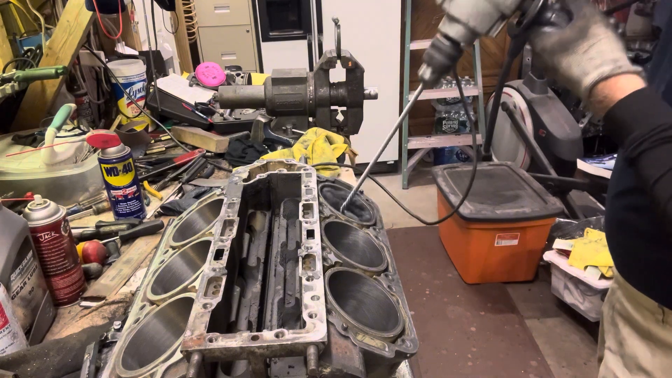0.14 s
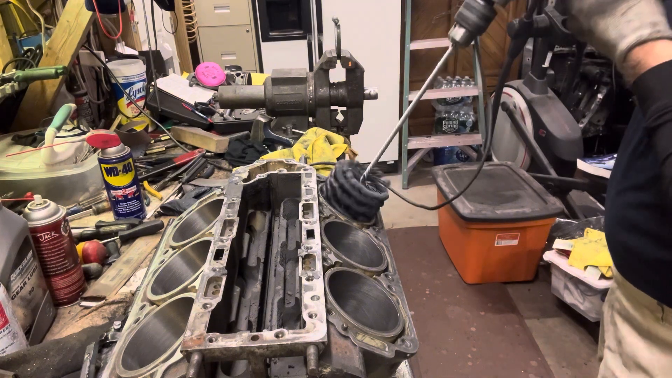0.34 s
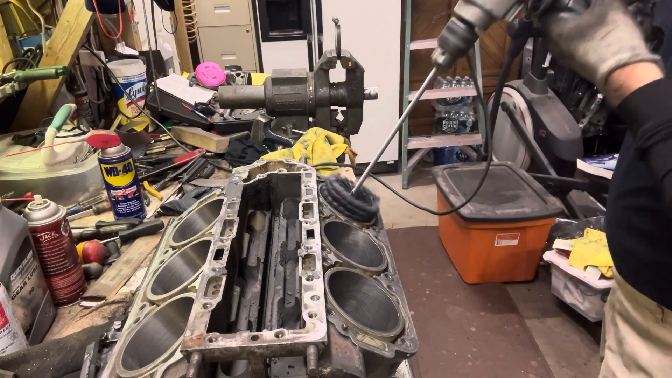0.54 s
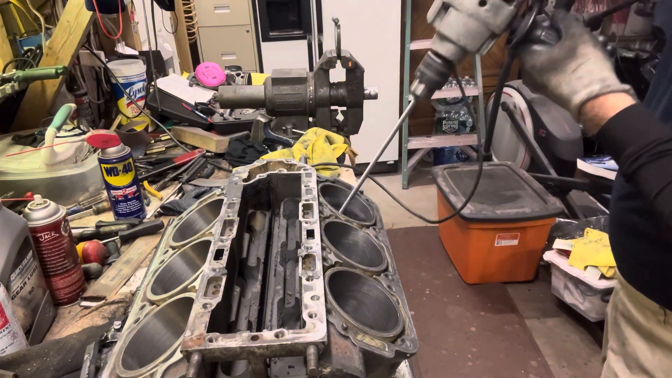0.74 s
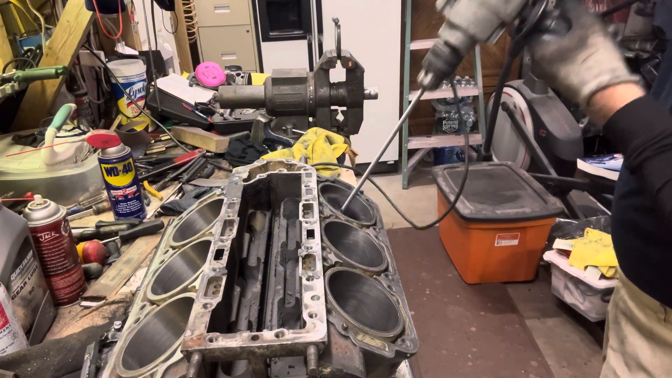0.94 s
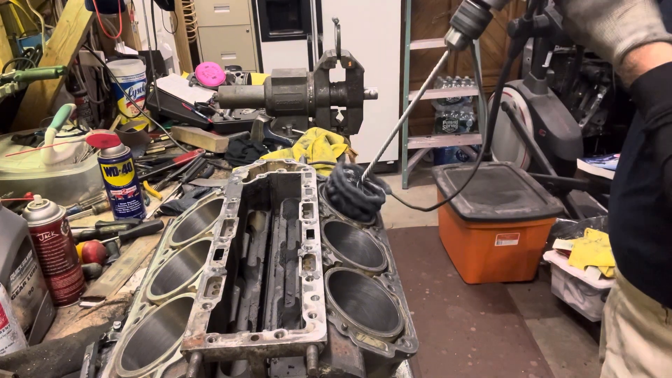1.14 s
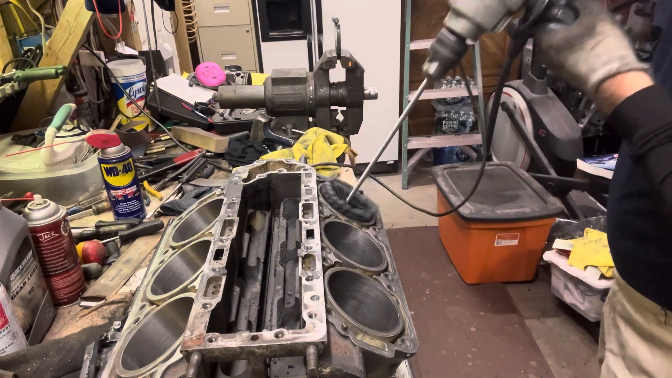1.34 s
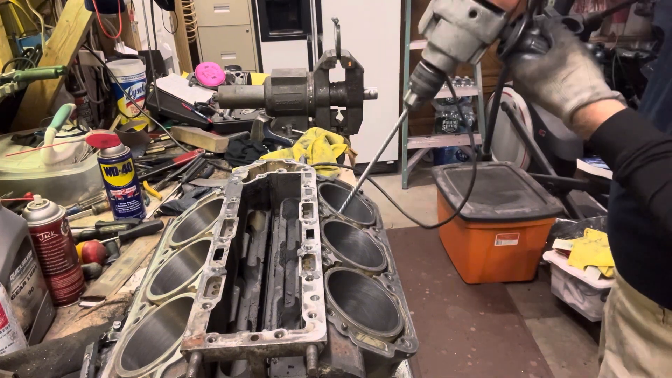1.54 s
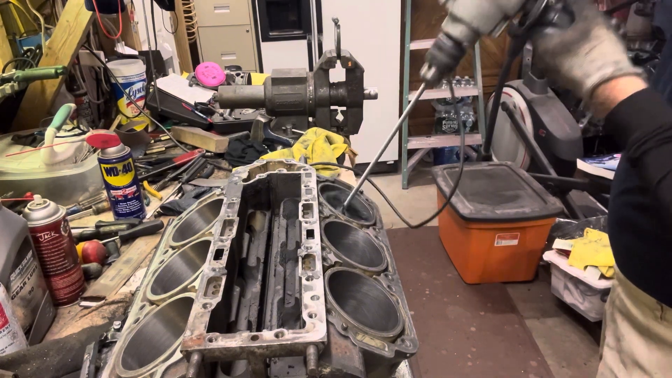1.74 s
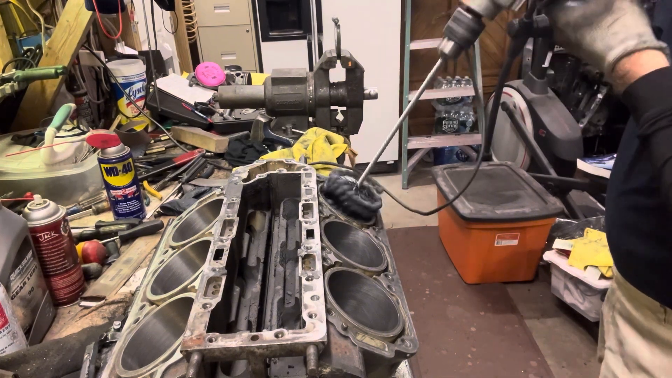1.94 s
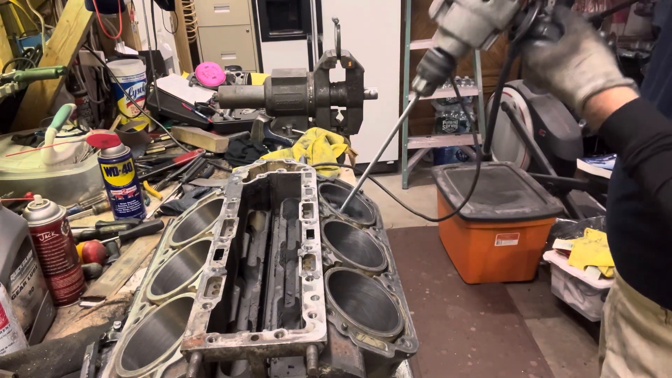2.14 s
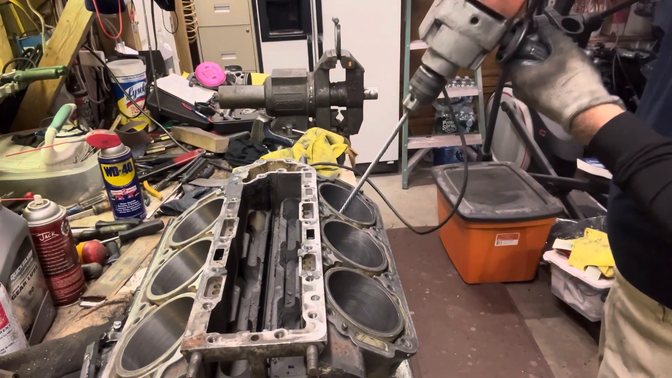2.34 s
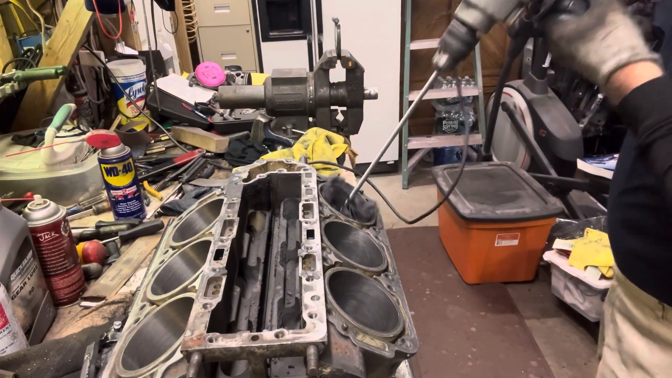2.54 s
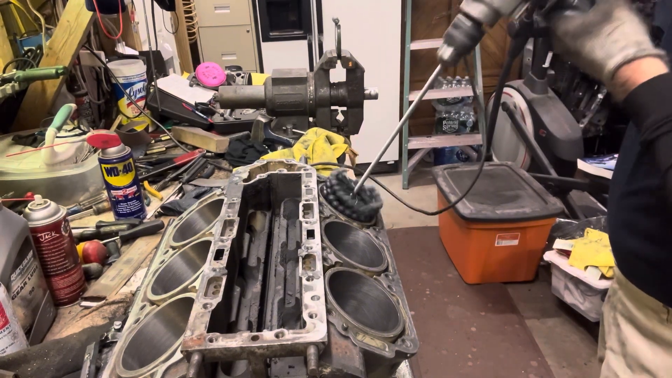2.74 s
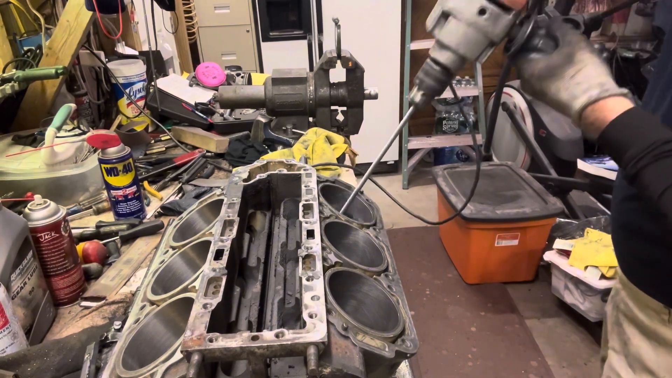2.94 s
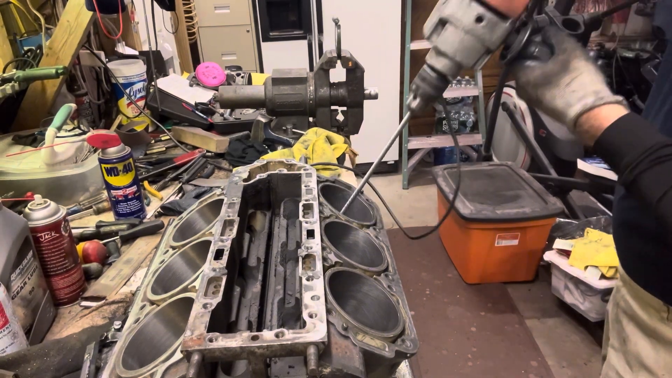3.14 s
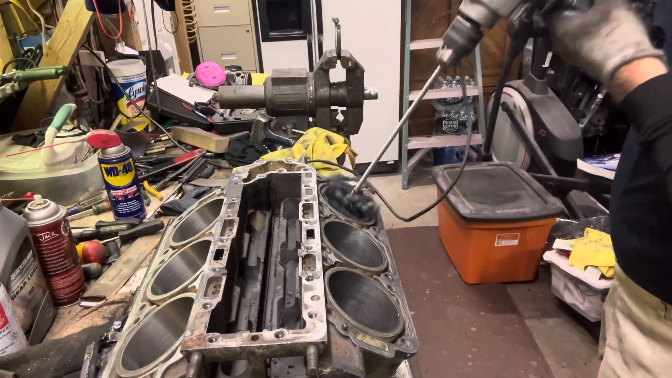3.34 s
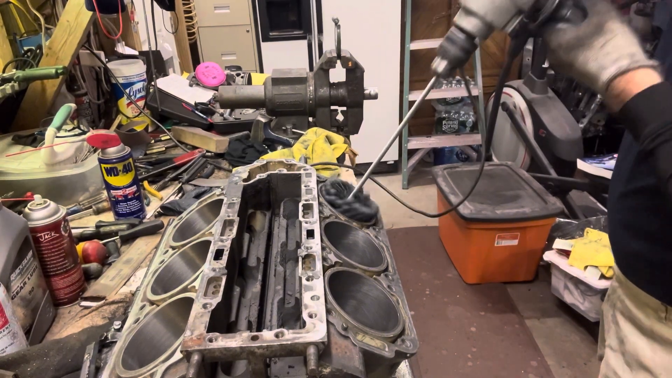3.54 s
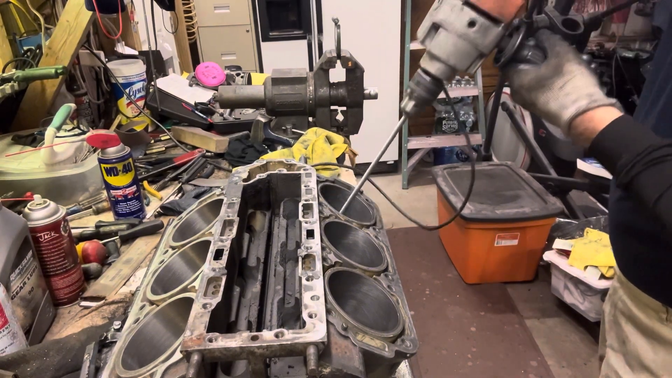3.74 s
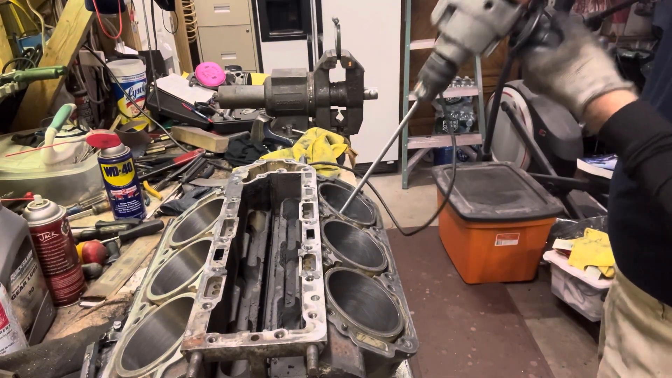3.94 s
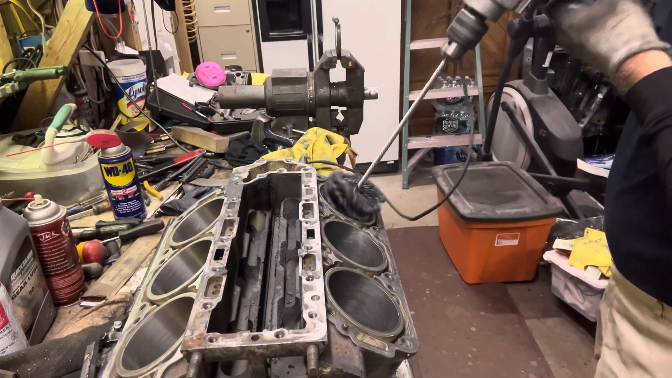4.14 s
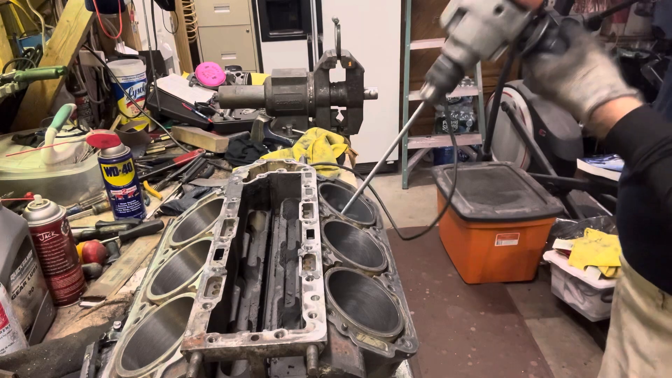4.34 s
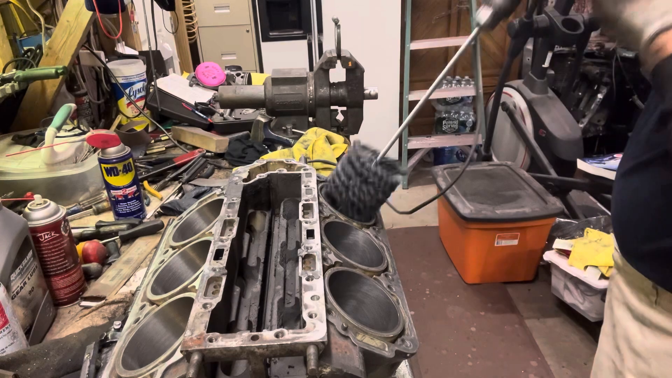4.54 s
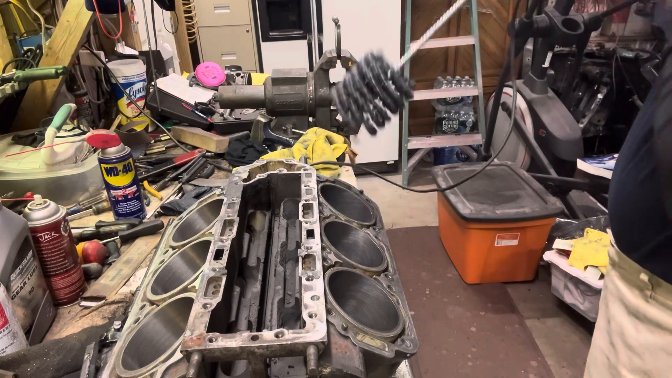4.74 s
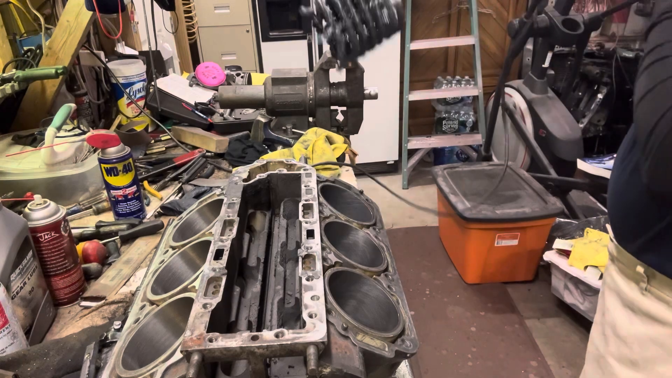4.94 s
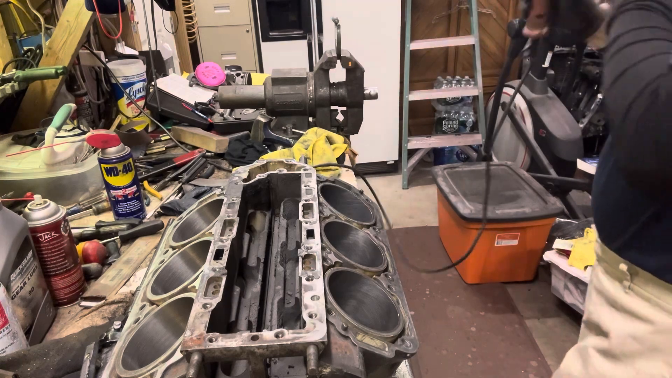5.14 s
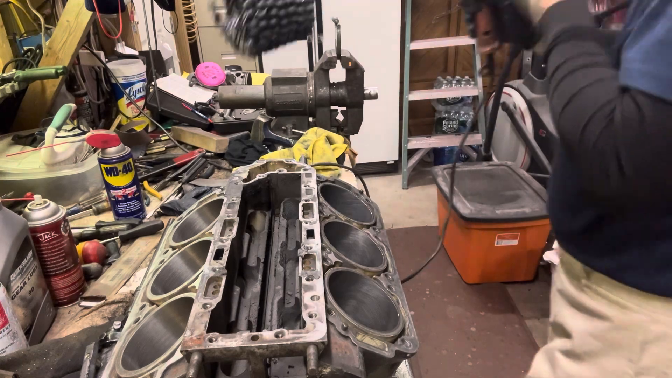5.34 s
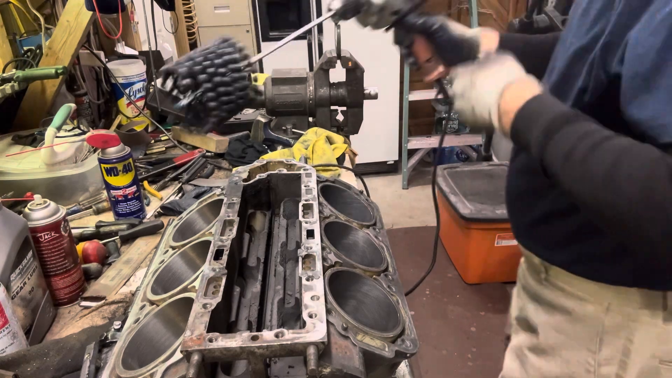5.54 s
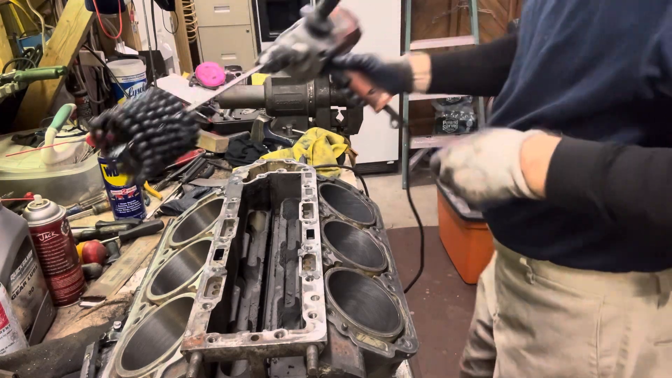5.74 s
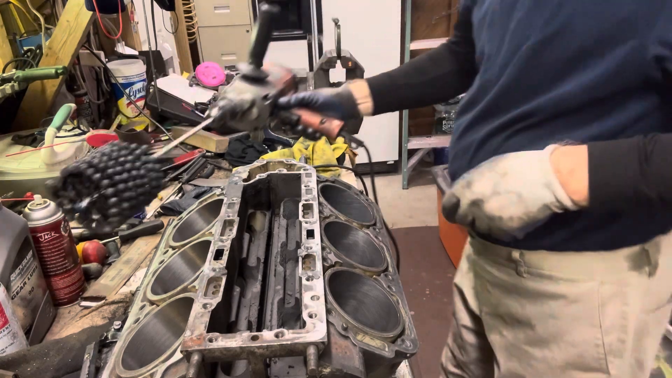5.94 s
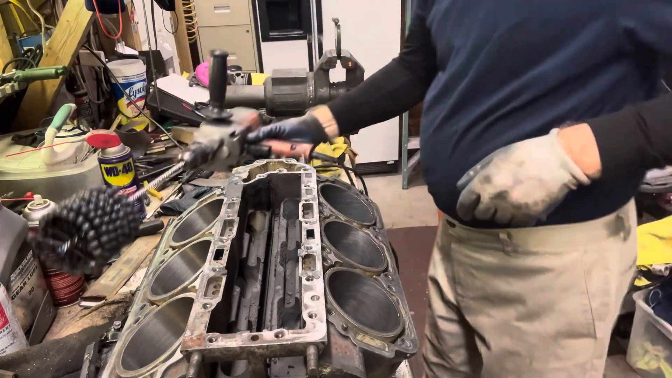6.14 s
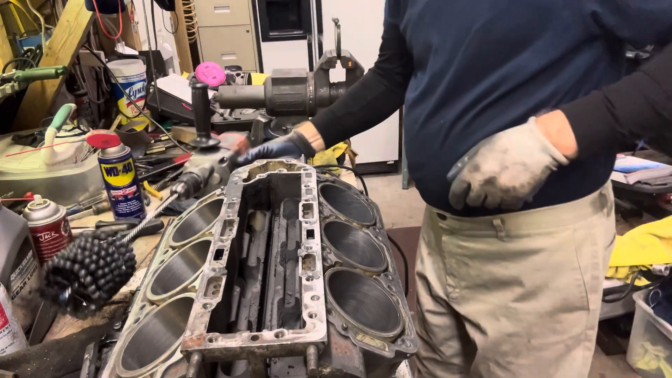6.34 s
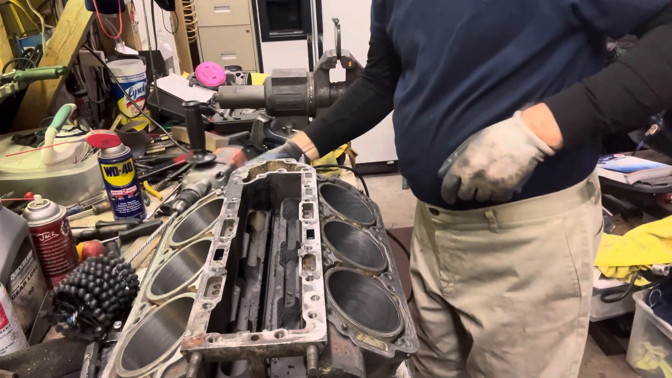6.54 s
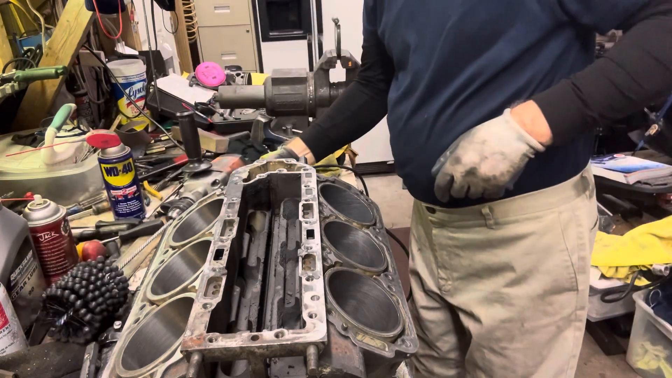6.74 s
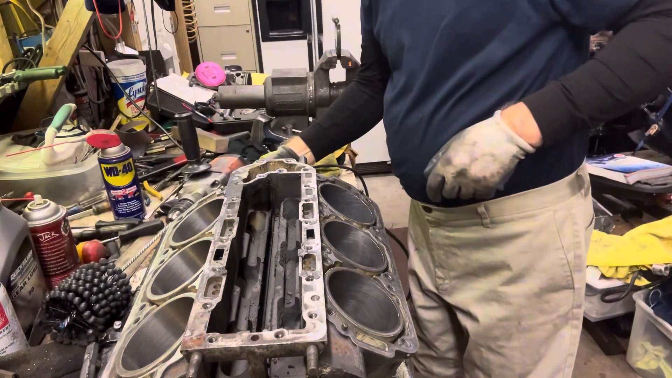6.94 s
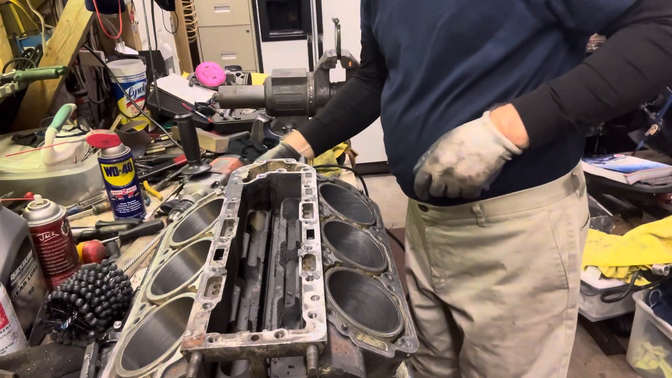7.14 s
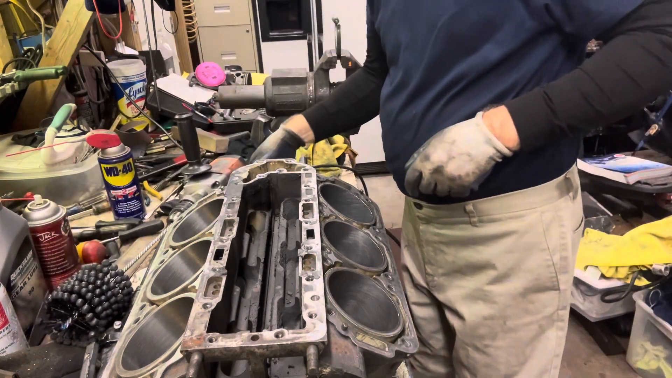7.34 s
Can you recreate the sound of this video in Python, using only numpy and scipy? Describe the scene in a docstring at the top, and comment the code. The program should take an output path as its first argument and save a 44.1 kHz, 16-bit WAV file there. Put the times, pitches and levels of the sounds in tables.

```python
"""Honing an engine cylinder with a drill

A corded drill strokes a ball hone up and down an oiled cylinder in a small workshop.
Load and motor speed steer sine tones for the whining gears and random impacts for their chatter.
Filtered grains and gliding squeaks make the abrasive balls scrape the ringing bore.
The hone comes out, the drill coasts down with rattling gears and is laid on the bench with faint clicks."""
import sys
import numpy as np
from scipy import signal
from scipy.fft import rfft, irfft, next_fast_len
from scipy.io import wavfile

SR = 44100
rng = np.random.default_rng(int(sys.argv[2]) if len(sys.argv) > 2 else 0)


def file_out(sig):
    """Save sig as 16-bit WAV at sys.argv[1]."""
    # one column per channel
    cols = np.atleast_2d(sig).T
    # limit, then scale
    lim = np.clip(cols, -1, 1)
    pcm = np.round(lim * 32767).astype(np.int16)
    wavfile.write(sys.argv[1], SR, pcm)


N = 330285
T = np.arange(N) / SR
SIZE = next_fast_len(N + SR // 2, real=True)  # room for filter tails
FREQ = np.maximum(np.arange(SIZE // 2 + 1) * SR / SIZE, 1)

TEETH = 7  # on the motor's pinion
FULL_HZ = 606  # tooth mesh rate counted as speed 1
# the hone is clear of the bore at OUT_S; the scrape and the strain on the gears fade just before
OUT_S, EXIT_S, UNLOAD_S = 4.55, 0.075, 0.21

# strokes of the hone: (bottom t/s, build-up of the drag t/s, load 0-1,
# bottom to mouth of the bore t/s, extra scrape at the mouth level/dB)
STROKES = [(0.099, 0.5545, 0.92, 0.46, 2.5), (0.85, .137, 0.56, 0.46, 4), (1.611, .175, 0.44, 0.43, 2),
           (2.357, 0.21, 0.89, 0.424, 4.5), (3.105, .125, .85, 0.61, 0), (3.862, 0.21, 1.0, 0.17, 0.5),
           (4.227, 0.0258, 0.98, 0.14, 2)]
# microphone pair: (f/Hz, phase by which left leads/rad, strength of the reflections' side part level/dB)
PAIR = [(40, 0, -6), (250, -.3, -1), (780, -2, 1), (1250, -1.1, 0), (1900, -2, 4), (2330, -1.2, 3),
        (2440, -2.7, 3), (2540, -2.4, 3), (2760, -5, 2), (2950, -4.6, 1), (3200, -5.1, -1), (3750, -5.1, 1),
        (4500, -7.7, 2), (6000, -8, 2), (6400, -7.4, 0), (7450, -8.2, 2), (7750, -6.3, -15),
        (11600, -6.3, -15), (12600, -3.6, 0)]


def mesh_rate():
    """Gear teeth met per second: the trigger sets it, load drags it down late, friction stops it at the end."""
    # trigger position: (t/s, mesh rate without load f/Hz)
    trigger = [(0.0, 794.6), (0.5, 802), (1.2, 784), (1.7, 681.1), (2.6, 635.4), (3.4, 622.1), (4.5, 601.1)]
    sag = .082  # share of speed lost at load 1
    lag_s, inertia_s = 0.03877, 0.07012  # how late and how slowly the motor follows the load
    off_s, brake_hz_per_s = 4.485, 424  # the trigger is let go
    s, hz = np.transpose(trigger)
    free_hz = np.interp(T, s, hz)
    load = hone_load(T - lag_s)
    keep = np.exp(-1 / (inertia_s * SR))
    felt = load[0] + signal.lfilter([1 - keep], [1, -keep], load - load[0])
    slowing = brake_hz_per_s * np.maximum(T - off_s, 0)
    return np.maximum(free_hz * (1 - sag * felt) - slowing, 1e-3)


def hone_load(t, relax_s=.067):
    """Drag on the drill: it grows ever faster towards the bottom of a stroke, then quickly relaxes."""
    return sum(load * np.exp(-np.maximum(s - t, 0) / build_s - np.maximum(t - s, 0) / relax_s)
               for s, build_s, load, _, _ in STROKES)


def in_bore(fade_s):
    """1 while the hone is in the cylinder, fading to 0 as it leaves."""
    return np.clip((OUT_S - T) / fade_s, 0, 1)


def gear_whine(turns, mesh_hz, strain, jitter=0.016, trim_db=-4.0, runout=0.096):
    """Pinion teeth mesh a little unevenly; strain lifts the tones, the third and fifth most of all."""
    # whine before trim and resonances: (multiple of the mesh rate, level/dB, level/dB added at strain 1)
    gear_tones = [(1, -60.5, 9.5), (2, -55.5, 8), (3, -60.5, 26), (4, -55, 12), (5, -61.5, 18),
                  (6, -57, 4.5)]
    cycles = TEETH * turns + jitter * walk(rate=250)
    # an off-centre pinion presses harder once a turn
    contact = 1 + runout * np.cos(2 * np.pi * turns)
    tones = 0
    for k, db, load_db in gear_tones:
        tone_db = db + load_db * strain + shell_db(k * mesh_hz)
        tones = tones + tone(round(k) * cycles, k * mesh_hz, squealing(TEETH * round(k), tone_db))
    return in_bore(UNLOAD_S) * contact * tones * undb(trim_db)


def shell_db(hz):
    """Lift of a tone by the resonances of the drill's shell, in dB."""
    # shell resonances: (f/Hz, width f/Hz, lift at the centre level/dB)
    shell = [(809, 65, 24.5), (1444, 335, 20), (1943, 125, 3), (2340, 270, 6), (3000, 1230, 13.5)]
    return sum(db / (1 + (2 * (hz - centre) / width) ** 2) for centre, width, db in shell)


def squealing(order, db):
    """Level in dB of the tone at one multiple of the motor speed, swelling smoothly into its squeals."""
    # flare-ups of gear or armature tones, before trim: (t/s, half length t/s, multiple of motor speed,
    # level/dB)
    squeal_list = [(0.126, 0.068, 7, -27), (0.5, 0.2, 28, -26), (.92, .22, 28, -31.5), (.76, 0.3, 7, -31),
                   (0.765, 0.24, 14, -28), (1.208, .09, 28, -29), (1.5, 0.15, 7, -34),
                   (1.555, 0.09, 28, -22.5), (1.9, 0.17, 14, -33), (2.1, .35, 24, -42),
                   (2.334, 0.08, 21, -24.5), (2.324, .07, 28, -26), (2.32, 0.14, 35, -34),
                   (2.358, 0.05, 42, -34), (2.6, .22, 14, -37), (2.9, .14, 28, -29), (3.08, 0.1, 21, -24.5),
                   (3.11, 0.072, 35, -28), (3.455, 0.1, 14, -34), (3.5, .25, 28, -32),
                   (3.74, .2, 35, -30.5), (3.884, 0.095, 28, -24), (3.8, 0.5, 7, -40),
                   (4.236, 0.025, 21, -27), (4.78, .09, 24, -49), (4.844, .04, 12, -45)]
    swell = sum(undb(peak_db) * np.exp(-((T - s) / half_s) ** 2)
                for s, half_s, k, peak_db in squeal_list if round(k) == order)
    return 20 * np.log10(np.hypot(undb(db), swell) + 1e-12)


def tone(cycles, hz, db, flutter_db=1.8, swirl=0.4):
    """A stereo sine; as the drill moves through the room's standing waves each side flutters on its own."""
    pair_hz, pair_lead, _ = np.transpose(PAIR)
    lead = swirl * walk(rate=9) + np.interp(hz, pair_hz, pair_lead)
    sides = []
    for sign in (1, -1):
        gain = np.sqrt(2) * undb(db + flutter_db * walk(rate=42))
        sides.append(gain * np.sin(2 * np.pi * cycles + sign * lead / 2))
    return np.array(sides)


def chatter(turns, mesh_hz, gain, tooth_depth=0.42, pole_depth=0.63, slack_depth=0.45,
            loose=0.95, trim_db=-2):
    """Teeth and brushes rasp in time with the motor and ring the shell; slow gears add separate ticks."""
    slow = np.clip(1 - mesh_hz / 560, 0, 1)
    tooth = 1 + tooth_depth * np.cos(2 * np.pi * TEETH * turns)
    # the brushes pulse twice a turn
    pole = 1 + (pole_depth + slack_depth * slow) * np.cos(2 * np.pi * 2 * turns)
    rasp = grains(rate=7000, spread_db=2.5) * (1 - slow / 2)
    ticks = loose * np.sqrt(slow) * grains(rate=390, spread_db=2.4)
    ringing = housing((rasp + ticks) * tooth ** 2 * pole)
    return unit(ringing) * gain * undb(trim_db + 1.0 * walk(rate=45))


def housing(x, flicker_db=1.5):
    """The gearbox shell rings; its modes swell and fade separately as the gears shift on their bearings."""
    # gearbox resonances: (f/Hz, width f/Hz, level relative to each other/dB)
    box_modes = [(844, 160, -2.5), (1310, 200, -1), (1575, 110, 2), (1890, 170, 2), (2250, 200, -1),
                 (2525, 350, 1), (3120, 400, -0.5), (3830, 710, -10.5)]
    out = 0
    for k, (hz, width, db) in enumerate(box_modes):
        gain = (-1) ** k * undb(db + flicker_db * walk(rate=32))
        out = out + gain * shape(x, resonance(hz, width))
    return out


def chatter_level(speed, strain):
    """Gain of the chatter: it rises with speed and strain, and a light rattle stays when gears run free."""
    driven = undb(-31.5 + 4 * strain) * speed ** 1.55
    stall_speed = 0.03  # below this the coasting gears fall silent
    coasting = undb(-46) * speed ** 0.64 * np.minimum(speed / stall_speed, 1)
    return np.hypot(driven * in_bore(UNLOAD_S), coasting)


def armature(turns, mesh_hz, air_db=-46, jitter=0.004, flutter_db=3.2, coupling=0.3, coast_db=-8,
             speed_power=1.7):
    """Fan and commutator tones slide through the shell's resonances over rushing air; coasting fades them."""
    # armature tones before speed and resonances act: (multiple of the motor speed, level/dB)
    motor_lines = [(12, -51), (24, -55), (36, -53)]
    speed = np.minimum(mesh_hz / FULL_HZ, 1)
    coasting = 1 - in_bore(EXIT_S)
    shaky = turns + jitter * (1 + coasting) * walk(rate=160)
    motor_hz = mesh_hz / TEETH
    drive_db = 20 * speed_power * np.log10(speed) + coast_db * (coasting - .5)
    tones = 0
    for k, db in motor_lines:
        tone_db = db + drive_db + coupling * shell_db(k * motor_hz)
        tones = tones + tone(round(k) * shaky, k * motor_hz, squealing(round(k), tone_db), flutter_db)
    air_colour = colour([(100, -24.0), (450, -6.5), (620, -1.5), (1200, -19), (3000, -9.5), (12000, -39.5)])
    air = unit(shape(noise(), air_colour))
    return tones, air * undb(air_db) * speed ** 1.24


def hone(gain, catch_db=-13, ring_db=-0.5, squeak_db=-12, trim_db=1.0):
    """Balls drag in tiny slips and squeaks; the wall's modes flicker as the balls move over it."""
    # cylinder wall resonances: (f/Hz, width f/Hz, level against the broad scrape before ring_db/dB)
    wall_modes = [(1330, 18, -6), (3060, 30, -2), (3210, 45, 1.5), (3645, 36, -1), (3898, 16, -3),
                  (4348, 16, -3), (4925, 40, -3), (6380, 70, -4), (6950, 83, -2.5), (7730, 100, -7)]
    # broad colour of the scrape: (f/Hz, level/dB)
    scrape_colour = [(25, -10.5), (55, -0.5), (110, -6), (170, -13), (320, -5), (460, 0.5), (580, 3),
                     (1200, -3.5), (2500, 0.5), (4500, 1.5), (6000, 3), (7300, 3), (7900, 4), (11800, -2),
                     (15500, -4.5)]
    pressure = undb(1.8 * walk(rate=130))
    slips = grains(rate=6000, spread_db=1.5) * pressure
    catches = undb(catch_db) * grains(rate=160, spread_db=3.0)
    scrape = shape(slips + catches, colour(scrape_colour))
    wall = sum(undb(db + ring_db + 3 * walk(rate=18)) * shape(scrape, resonance(hz, width))
               for hz, width, db in wall_modes)
    return (unit(scrape + wall) + undb(squeak_db) * squeaks()) * gain * undb(trim_db)


def squeaks(count=1300, spread_db=4):
    """Single balls stick and slip: short gliding squeaks, each with its own pitch, length and strength."""
    low_hz, high_hz = 1600, 3600  # range of starting pitches
    mean_s, glide_spread = .04, .02  # average length; spread of the glides as a share of the pitch
    out = np.zeros(N + SR)
    for (when, pitch, length), (glide, size) in zip(rng.random((count, 3)), rng.standard_normal((count, 2))):
        age = np.linspace(0, 1, int(mean_s * (.5 + length) * SR))
        hz = low_hz * (high_hz / low_hz) ** pitch * (1 + glide_spread * glide * age)
        swell = np.sin(np.pi * np.sqrt(age)) ** 2
        squeak = swell * np.sin(2 * np.pi * np.cumsum(hz) / SR)
        start = int(when * N)
        out[start:start + len(age)] += undb(spread_db * min(size, 2)) * squeak
    return unit(out[:N])


def scrape_level(speed, strain, mouth_s=0.069, dip_db=-1, dip_s=0.043):
    """Gain of the hone: load and the mouth raise it, it dips just after the mouth; outside, a faint swish."""
    stroke_db = 0
    for s, _, _, rise_s, db in STROKES:
        stroke_db = stroke_db + db * np.exp(-((T - s - rise_s) / mouth_s) ** 2)
        stroke_db = stroke_db + dip_db * np.exp(-((T - s - 1.2 * rise_s) / dip_s) ** 2)
    scraping = undb(-29 + 5 * strain + stroke_db) * speed ** 0.92
    swish = undb(-45.5) * speed ** 1.3
    return np.hypot(scraping * in_bore(EXIT_S), swish)


def ball_snaps():
    """Balls catch and snap against the bore: bright, short bursts."""
    # snaps: (t/s, peak before the room level/dB, t60 of the burst t/s)
    snap_list = [(1.27, -15, .05), (1.4945, -12, .04), (2.34, -12, .07), (2.39, -9.5, .07),
                 (2.527, -11, .014), (2.966, -11.5, .04), (3.318, -10, .01), (3.945, -11, .014),
                 (4.412, -12, .008)]
    ball = broad(hz=8400, width=1.3)
    return sum(knock(s, db, t60, ball) for s, db, t60 in snap_list)


def gear_ticks():
    """Gear teeth knock through their slack while coasting and ring the gear."""
    # knocks: (t/s, peak before the room level/dB)
    backlash = [(4.562, -24), (4.5784, -22), (4.6055, -16.5), (4.632, -20.5), (4.653, -24), (4.6753, -20),
                (4.7593, -34), (4.7886, -31), (4.811, -32), (4.847, -34), (4.921, -24), (4.944, -31),
                (5.0295, -27), (5.0713, -30), (5.124, -27.5), (5.1538, -34), (5.1802, -32), (5.2046, -34)]
    # modes of the knocking gear: (f/Hz, width before squaring f/Hz, level/dB)
    gear_modes = [(3250, 340, 0.5), (3460, 340, -1)]
    gear = sum(undb(db) * resonance(hz, width) ** 2 for hz, width, db in gear_modes)
    return sum(knock(s, db, .005, gear) for s, db in backlash)


def chuck_rattles():
    """The hone's shank rattles in the ringing chuck as the drill is swung aside."""
    # rattles: (t/s, peak before the room level/dB)
    rattle_list = [(5.153, -29), (5.43, -34.5), (5.464, -37), (5.562, -46), (5.581, -42), (5.635, -42),
                   (5.672, -42), (5.765, -39), (5.868, -38)]
    # modes of the chuck: (f/Hz, width f/Hz, level/dB)
    chuck_modes = [(1750, 130, 1), (2500, 130, 2), (3240, 110, -4)]
    chuck = sum(undb(db) * resonance(hz, width) for hz, width, db in chuck_modes)
    return sum(knock(s, db, t60=0.025, response=chuck) for s, db in rattle_list)


def block_jolts():
    """The hone jolts the heavy engine block, which answers with a dull thud."""
    # jolts: (t/s, peak before the room level/dB, centre f/Hz)
    jolt_list = [(3.822, -33.5, 97.4), (3.947, -34, 51)]
    return sum(knock(s, db, t60=0.089, response=broad(hz, width=0.29)) for s, db, hz in jolt_list)


def handling_clicks():
    """The tool clicks while being put down, each contact a damped burst."""
    # clicks: (t/s, peak before the room level/dB, centre f/Hz, t60 of the burst t/s,
    # width before squaring as a share of the centre)
    click_list = [(5.124, -28, 1500, 0.049, 1.6), (5.225, -29, 1900, 0.025, 4.5),
                  (5.288, -30, 1305, 0.06, 2.6), (5.342, -31.5, 1900, 0.035, 2.6),
                  (5.404, -32, 2580, 0.031, 1.6), (5.817, -32.5, 1000, 0.12, 1.4),
                  (6.557, -34.5, 8280, 0.0083, 0.56), (6.644, -34.5, 1750, 0.028, 1.6),
                  (6.777, -34, 1450, 0.029, 2.1), (7.149, -42.5, 4100, 0.09, 0.85)]
    return sum(knock(s, db, t60, broad(hz, width)) for s, db, hz, t60, width in click_list)


def rustle(attack_s=0.012, release_s=0.053, fade_db_per_s=25):
    """Sleeve and cord slide softly; each slide starts briskly and tails off."""
    # slides: (t/s, length t/s, starting level before the room/dB)
    slide_list = [(6.133, 0.23, -60), (6.45, 0.22, -61.5), (6.728, 0.12, -61), (7.102, 0.6, -60)]
    gain = 0
    for s, length, db in slide_list:
        ramp = np.clip(np.minimum((T - s) / attack_s, (s + length - T) / release_s), 0, 1)
        gain = gain + ramp * undb(db - fade_db_per_s * np.maximum(T - s, 0))
    rub_colour = colour([(200, 5), (1000, 11.5), (3000, 3), (10000, -4), (14000, -15)])
    return unit(shape(grains(rate=3400, spread_db=-0.5), rub_colour)) * gain


def background(width=0.58):
    """Low rumble, hiss and a machine's mains hum fill the room, slightly stronger on the left."""
    # colour of rumble and hiss: (f/Hz, level/dB)
    room_tone = [(20, -38.5), (40, -8.5), (58, -6), (80, -4.5), (120, -11.5), (170, -15), (245, -12),
                 (400, -18), (700, -26), (1500, -32.5), (4000, -46.5), (12000, -64)]
    # hum, wavering around these values: (f/Hz, level before the lean to the left/dB)
    hum_lines = [(59.2, -51.5), (237, -58)]
    mid, side = (unit(shape(noise(), colour(room_tone))) for _ in range(2))
    hum = 0
    for hz, db in hum_lines:
        gain = np.sqrt(2) * undb(db + 2 * walk(rate=8.3))
        hum = hum + gain * np.sin(2 * np.pi * hz * T + 1.2 * walk(rate=7))
    air = undb(-50.0) * (mid + width * np.array([side, -side]))
    return (air + hum) * undb([[1.2], [-1.2]])


def workshop(x, reflections_db, t60=0.16):
    """Direct sound with left mostly behind right in phase, plus short reflections from the clutter."""
    # left minus right level of the room: (f/Hz, level/dB)
    lean_curve = [(110, 5.5), (380, 0), (700, -3.5), (1290, -2.5), (2400, 1), (4400, -0.5), (8000, -0.7)]
    hz, lead, width_db = np.transpose(PAIR)
    turn = np.exp(.5j * np.interp(FREQ, hz, lead))
    direct = shape(x, np.array([turn, 1 / turn]))
    # the blend of three reflection paths wanders at random, standing for the moving tool
    shares = np.array([walk(rate=6) for _ in range(3)])
    shares /= np.linalg.norm(shares, axis=0)
    mid, side = sum(shape(x * share, reflections(t60)) for share in shares)
    side = shape(side, colour(np.transpose([hz, width_db])))
    wet = undb(reflections_db)
    both = direct + wet * np.array([mid + side, mid - side])
    lean = np.sqrt(colour(lean_curve))
    return shape(both, np.array([lean, 1 / lean])) / np.sqrt(1 + wet ** 2)


def reflections(t60):
    """Mid and side response of the room for one path: two dying noise tails."""
    tails = np.array([burst(.003, t60) for _ in range(2)])
    return rfft(tails, SIZE) / np.sqrt(np.sum(tails ** 2))


def knock(s, db, t60, response):
    """One contact: a noise burst rings a body and is scaled to its peak level."""
    start, length = int(s * SR), SR // 4
    body = irfft(response, SIZE)[:length]
    x = signal.fftconvolve(burst(0, t60)[:length], body)[:length]
    return np.pad(x * undb(db) / np.abs(x).max(), (start, N))[:N]


def burst(s, t60):
    """Short noise that starts at s seconds and dies away by 60 dB in t60 seconds."""
    age = np.maximum(T[:SR // 4] - s % (1 / SR), 0)
    start = int(s * SR)
    out = np.zeros(N + len(age))
    out[start:start + len(age)] = rng.standard_normal(len(age)) * np.exp(-np.log(1000) * age / t60)
    return out[:N]


def resonance(hz, width):
    """Complex response of one mode, gain 1 at its centre."""
    return 1 / (1 + 1j * (FREQ ** 2 - hz ** 2) / (FREQ * width))


def broad(hz, width):
    """A damped body: one mode squared, its width before squaring a share of the centre frequency."""
    return resonance(hz, width * hz) ** 2


def grains(rate, spread_db):
    """Random impacts of unequal size, about rate per second, at rms 1."""
    size = undb(spread_db * np.minimum(rng.exponential(size=N), 5))
    return unit((rng.random(N) < rate / SR) * size * np.sign(noise()))


def walk(rate):
    """Random wander in straight lines between rate knots a second, spread near 1."""
    knots = rng.standard_normal(4096)
    return 1.2 * np.interp(T * rate, np.arange(len(knots)), knots)


def noise():
    """White noise."""
    return rng.standard_normal(N)


def colour(points):
    """Gain at every frequency from (f/Hz, level/dB) points."""
    hz, db = np.transpose(points)
    return undb(np.interp(np.log(FREQ), np.log(hz), db))


def shape(x, response):
    """Filter by a frequency response."""
    return irfft(rfft(x, SIZE) * response, SIZE)[..., :N]


def undb(db):
    """Decibels to gain."""
    return 10 ** (np.asarray(db) / 20)


def unit(x):
    """Scale to rms 1."""
    return x / np.sqrt(np.mean(x ** 2))


def scene(strain_power=0.51):
    """Motor speed and the load of the strokes drive the whine, the chatter and the scrape."""
    mesh_hz = mesh_rate()
    strain = hone_load(T) ** strain_power
    turns = np.cumsum(mesh_hz) / TEETH / SR
    speed = mesh_hz / FULL_HZ
    motor_tones, fan_air = armature(turns, mesh_hz)
    whine = gear_whine(turns, mesh_hz, strain) + motor_tones
    # the drill is further from the microphones than the cylinder, so more of it is reflected
    rasp = chatter(turns, mesh_hz, chatter_level(speed, strain))
    drill = workshop(rasp + fan_air, reflections_db=1.0)
    bore = workshop(hone(scrape_level(speed, strain)), reflections_db=-2.5)
    knocks = ball_snaps() + gear_ticks() + chuck_rattles() + block_jolts() + handling_clicks()
    handling = workshop(knocks + rustle(), reflections_db=-3.0)
    return whine + drill + bore + handling + background()


def record(dry):
    """Treble common to both sides falls away above 12.6 kHz; a steep low-pass ends the rest at 15.9 kHz."""
    shared = dry.mean(axis=0)
    dulled = dry - shared + shape(shared, colour([(12600, 0.0), (13600, -27.0)]))
    return signal.sosfilt(signal.ellip(10, .2, 80, 15900, fs=SR, output="sos"), dulled)


dry = scene()
out = record(dry)
file_out(out)
```